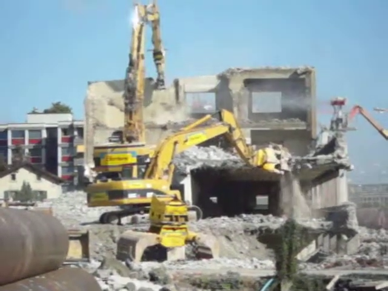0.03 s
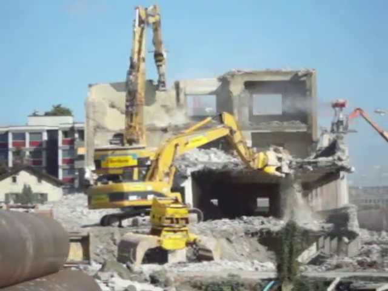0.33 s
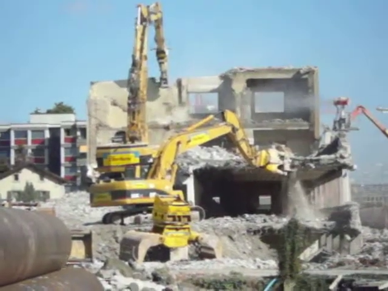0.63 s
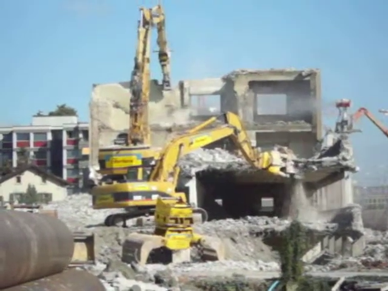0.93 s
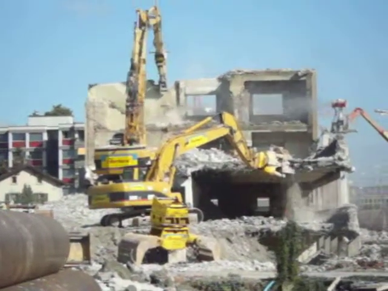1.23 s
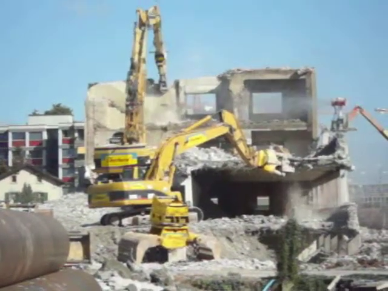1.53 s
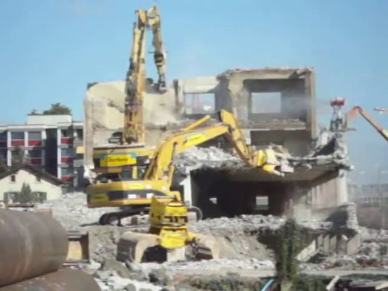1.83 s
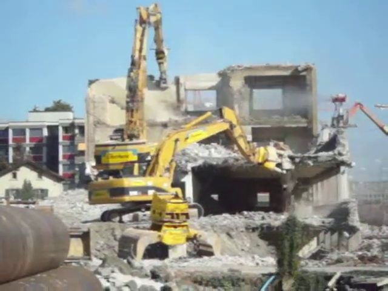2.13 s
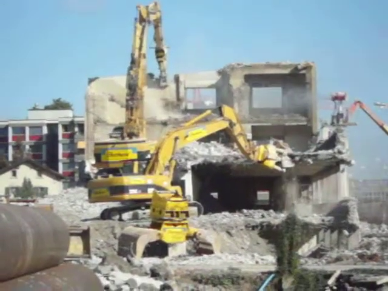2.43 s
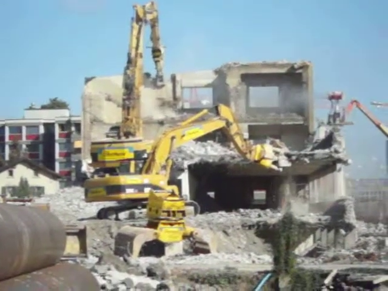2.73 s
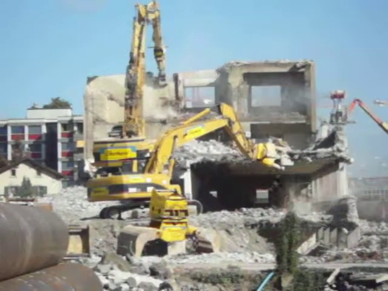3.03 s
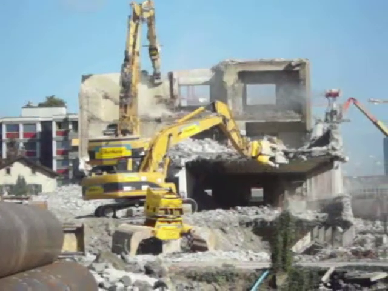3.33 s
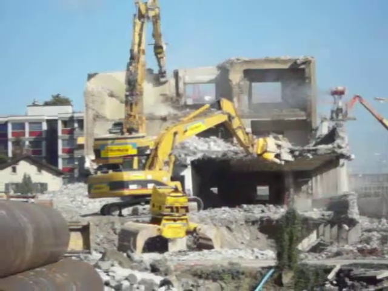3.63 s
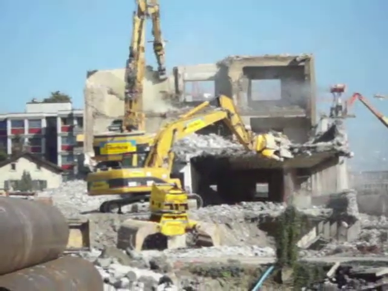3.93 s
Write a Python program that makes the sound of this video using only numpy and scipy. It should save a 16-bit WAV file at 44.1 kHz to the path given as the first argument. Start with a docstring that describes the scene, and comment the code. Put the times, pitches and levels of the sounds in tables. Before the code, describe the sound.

Diesel excavators rumble steadily on an outdoor demolition site, with a faint whine and brief metal squeaks. Midway, concrete cracks and crunches with a short echo, and small stones clink. The microphone sounds dull.

```python
"""Diesel excavators drone on a demolition site, their exhaust firing tone swelling and dipping.
Behind it, engines, fans and far traffic roar, pumps whine, oil rushes through a valve and steel squeaks.
Midway a concrete slab cracks in the jaws: bursts of tiny fractures ring slab and steel and echo
from the building. Small stones clink and trickle."""
import sys
import numpy as np
from scipy import signal
from scipy.fft import rfft, irfft
from scipy.io import wavfile

SR = 44100
rng = np.random.default_rng(int(sys.argv[2]) if len(sys.argv) > 2 else 0)


def wav_out(sig):
    """Save sig, one row per channel (or a flat mono array), as 16-bit PCM at SR to the path in sys.argv[1]."""
    wavfile.write(sys.argv[1], SR, np.round(np.clip(np.atleast_2d(sig).T, -1, 1) * 32767).astype(np.int16))


N = 176400
TIME_S = np.arange(N) / SR
CYLINDERS = 6


def from_db(db):
    """Decibels to gain."""
    return 10 ** (np.asarray(db) / 20)


def unit_rms(x):
    """Scale to unit power."""
    return x / np.sqrt(np.mean(x ** 2) + 1e-20)


def curves(rows):
    """Interpolate each column after time_s to every sample."""
    time_s, *columns = np.transpose(rows)
    return [np.interp(TIME_S, time_s, column) for column in columns]


def drift(rate_hz):
    """Slow random wander, unit RMS."""
    hop, settle = 40, 2000
    pole = np.exp(-2 * np.pi * rate_hz * hop / SR)
    noise = rng.standard_normal(N // hop + settle + 2)
    slow = signal.lfilter([1], [1, -2 * pole, pole * pole], noise)[settle:]
    return np.interp(np.arange(N) / hop, np.arange(len(slow)), unit_rms(slow))


def phase_rad(hz):
    """Running phase from a random start."""
    return 2 * np.pi * (np.cumsum(hz) / SR + rng.random())


def resonate(x, hz, t60_s):
    """Drive one decaying mode."""
    pole, step_rad = from_db(-60 / (t60_s * SR)), 2 * np.pi * hz / SR
    return signal.lfilter([0, np.sin(step_rad)], [1, -2 * pole * np.cos(step_rad), pole * pole], x + 1e-18)


def noise_band(hz, t60_s):
    """Noise-driven mode, unit RMS."""
    return unit_rms(resonate(rng.standard_normal(N), hz, t60_s))


def colour(x, spectrum):
    """Minimum-phase filter; white noise keeps its power."""
    size = 8192
    hz, db = np.transpose(spectrum)
    bins_hz = np.arange(size // 2 + 1) * SR / size
    gain = unit_rms(from_db(np.interp(np.log(bins_hz + 1), np.log(hz), db)))
    cepstrum = irfft(np.log(gain))[:size // 2]
    cepstrum[1:] *= 2
    return signal.fftconvolve(x, irfft(np.exp(rfft(cepstrum, size))))[:N]


def crossover(x, side, hz=1453):
    """Low or high side of a crossover that sums flat."""
    sos = signal.butter(4, hz, side, fs=SR, output="sos")
    return signal.sosfilt(sos, signal.sosfilt(sos, x))


def decay(start_s, t60_s):
    """Sudden onset, exponential decay."""
    age_s = TIME_S - start_s
    return (age_s >= 0) * from_db(-60 * np.clip(age_s / t60_s, 0, 4))


def clicks(per_s, spread_db):
    """Random impulses of uneven size, unit RMS."""
    sizes = from_db(spread_db * np.minimum(rng.exponential(1, N), 4)) * rng.choice([-1, 1], N)
    return unit_rms(sizes * (rng.random(N) < per_s / SR))


# Roar spectrum: frequency_hz, relative_density_db
ROAR_SPECTRUM = [(22, -5.5), (45, -1.5), (70, -3.5), (120, -1.5), (160, -1), (200, -2.5), (300, -2.5),
                 (370, -1), (450, -5.5), (620, -2), (750, -3), (880, -1.5), (1080, -4.5), (1270, -3),
                 (1500, -8.5), (1750, -13), (2200, -10.5), (2800, -14), (3350, -16.5), (4000, -26)]
# Roar envelope: time_s, low_db, treble_db
ROAR_LEVELS = [(0, -20, -30.5), (.5, -21.5, -30), (.95, -21.5, -32.5), (1.4, -23, -32.5),
               (1.85, -22.5, -33), (2.3, -21.5, -35), (2.7, -25, -33), (3.2, -23, -33.5), (3.6, -24, -35.5),
               (4, -23.5, -35)]


def roar(cycle_rad):
    """Engine, fan and traffic noise, throbbing with firings, crank and another machine's clatter."""
    clatter = np.sin(phase_rad(hz=63.4 * (1 + .03 * drift(2.4))))
    firing = np.sin(CYLINDERS * cycle_rad)
    crank = np.sin(2 * cycle_rad + drift(4))
    throb = 1 + .032 * firing + .09 * crank + .07 * clatter
    noise = colour(rng.standard_normal(N) * throb, ROAR_SPECTRUM)
    low_db, treble_db = curves(ROAR_LEVELS)
    low = unit_rms(crossover(noise, "low")) * from_db(low_db + .5 * drift(21))
    treble = unit_rms(crossover(noise, "high")) * from_db(treble_db + .5 * drift(9.1))
    return low + treble


# Machine tones: pitch_hz, level_db
WHINE_TONES = [(64.7, -39.5), (58.73, -37.5), (280.2, -39), (485.6, -41.5), (638, -44), (861, -43),
               (1663, -58), (2140, -54.5), (2770, -53.5)]


def whines():
    """Pumps, fans and gears hum, wavering in level and pitch."""
    tones = 0
    for pitch_hz, level_db in WHINE_TONES:
        peak = np.sqrt(2) * from_db(level_db + 3.8 * drift(1.3))
        tones += peak * np.sin(phase_rad(pitch_hz * (1 + .00562 * drift(8))))
    return tones


# Oil flow noise: time_s, level_db
VALVE_LEVELS = [(0, -32.5), (.45, -29), (1.0, -32.5), (1.6, -42), (4, -44)]


def valve():
    """Hydraulic oil rushes through a valve and eases off."""
    level_db, = curves(VALVE_LEVELS)
    return from_db(level_db) * noise_band(hz=854, t60_s=.018)


# Joint squeaks: centre_s, length_s, pitch_hz, level_db
JOINT_SQUEAKS = [(0.14, 0.14, 2430, -35.5), (0.438, 0.15, 3480, -37.5), (1.54, 0.051, 3380, -41.5),
                 (2.84, .05, 2800, -38.5)]


def squeaks():
    """Dry steel joints rub and sing briefly at one pitch."""
    sound = 0
    for centre_s, length_s, pitch_hz, level_db in JOINT_SQUEAKS:
        rub = np.exp(-(2 * (TIME_S - centre_s) / length_s) ** 2)
        sound += from_db(level_db) * rub * noise_band(pitch_hz, t60_s=.035)
    return sound


# Stone and steel clinks: start_s, pitch_hz, level_db, t60_s
RUBBLE_CLINKS = [(0.984, 3220, -29, 0.042), (2.137, 3704, -34, 0.053), (2.496, 3852, -30, 0.069),
                 (2.543, 3110, -29.5, .07), (2.545, 2240, -31, 0.066), (2.939, 1895, -31, .1),
                 (3.145, 3250, -33, 0.077)]


def rubble(stones_per_s=250, trickle_db=-44):
    """Single clinks over a steady trickle of small stones."""
    clinks = trickle = 0
    for start_s, pitch_hz, level_db, t60_s in RUBBLE_CLINKS:
        clinks += from_db(level_db) * decay(start_s, t60_s) * noise_band(pitch_hz, t60_s=.042)
    pitches_hz = np.geomspace(800, 3700, num=12)
    for pitch_hz in pitches_hz:
        hits = clicks(stones_per_s / len(pitches_hz), spread_db=.5)
        trickle += resonate(hits, pitch_hz, t60_s=22 / pitch_hz) / np.sqrt(pitch_hz)
    return clinks + from_db(trickle_db) * unit_rms(trickle)


def wall_echoes(direct, gain_db=-.5, build_s=.04, cutoff_hz=2500):
    """The hollow building scatters dulled echoes."""
    response = clicks(per_s=1500, spread_db=1.5) * decay(0, t60_s=.91) * (1 - np.exp(-TIME_S / build_s))
    echoes = signal.fftconvolve(direct, response / np.linalg.norm(response))[:N]
    return from_db(gain_db) * signal.sosfilt(signal.butter(1, cutoff_hz, fs=SR, output="sos"), echoes)


# Concrete cracking and falling: start_s, level_db, treble_offset_db, ring_offset_db, t60_s
SLAB_BLOWS = [(0.985, -18.5, 7, -9, .05), (1.898, -17, -2, -7.5, 0.15), (1.912, -10.5, 0.5, -6, .12),
              (1.940, -11.5, 0.5, 0.5, 0.13), (1.948, -11.5, -0.5, -6.5, 0.086),
              (1.971, -17.5, -1, -11.5, .06), (1.999, -22, 0, -18, 0.12), (2.039, -19, 3.5, -1, 0.086),
              (2.084, -17.5, -2.5, 2.5, .06), (2.143, -12.5, 0.5, -5, 0.15), (2.158, -14.5, 0, -2.5, 0.082),
              (2.190, -18, -8, 9, 0.036), (2.255, -21, 1.5, -2.5, .12)]
# Crunch spectrum: frequency_hz, relative_density_db
CRUNCH_SPECTRUM = [(60, -2), (190, 6.5), (300, -2), (430, -4), (540, 0.5), (660, 2), (920, -1.5), (1100, 1),
                   (1320, 1), (1600, -10), (2150, -6.5), (2600, -13.5), (2850, -17), (3100, -18),
                   (3400, -14.5), (3900, -27.5), (4300, -24.5)]
# Jaw and slab modes: pitch_hz, relative_db, t60_s
JAW_SLAB_MODES = [(196, -19, 0.22), (896, 2, 0.11), (961, 9, 0.028), (1250, -2.5, 0.021),
                  (2155, -11.5, 0.068), (2770, -12, 0.023), (3420, -22, 0.028)]


def slab_blows(cracks_per_s=9000, spread_db=2, ring_gain_db=.5):
    """Each blow is a dying burst of fractures; returns the crunch and the ring of slab and jaws."""
    low = treble = strike = 0
    for start_s, level_db, treble_offset_db, ring_offset_db, t60_s in SLAB_BLOWS:
        force = from_db(level_db) * decay(start_s, t60_s)
        low += force
        treble += force * from_db(treble_offset_db)
        strike += force * from_db(ring_offset_db)
    cracks = clicks(cracks_per_s, spread_db)
    bursts = crossover(cracks * low, "low") + crossover(cracks * treble, "high")
    crunch = colour(bursts, CRUNCH_SPECTRUM)
    knocks = strike * clicks(cracks_per_s, spread_db)
    ring = 0
    for pitch_hz, relative_db, t60_s in JAW_SLAB_MODES:
        ring += from_db(relative_db) * resonate(knocks, pitch_hz, t60_s) / np.sqrt(t60_s)
    return crunch, from_db(ring_gain_db) * strike.std() * unit_rms(ring)


# Near engine speed: time_s, firing_hz
FIRING_RATE = [(0, 91.5), (.4, 93.73), (.62, 90.4), (1.0, 92.0), (1.35, 90.84), (1.65, 91.77), (1.9, 91.9),
               (2.5, 92.2), (2.85, 91.64), (3.1, 92.4), (3.4, 91.37), (4, 91.93)]


def engine_cycle():
    """Phase of the near diesel; each cylinder fires once a cycle."""
    firing_hz, = curves(FIRING_RATE)
    return phase_rad(firing_hz / CYLINDERS)


# Near exhaust firing tone: time_s, level_db
EXHAUST_LEVELS = [(0,-18),(.15,-18),(.23,-29),(.29,-20),(.39,-23),(.49,-17),(.6,-26.5),(.69,-17.5),(.78,-16.5),(.86,-35),(1.0,-14),(1.11,-29),(1.2,-20),(1.45,-16),(1.67,-28),(1.82,-19.5),(2.14,-19),(2.2,-29.5),(2.29,-16),(2.39,-22),(2.5,-17),(2.7,-22),(2.88,-31),(2.98,-20),(3.22,-15.5),(3.53,-14.5),(3.7,-17),(3.79,-23),(3.86,-20.5),(3.94,-35),(4,-17)]
# Weak engine orders: cycle_multiple
ENGINE_ORDERS = [9, 10, 12, 15, 18]
# Strength of each order: level_db
ORDER_LEVELS = [-38.5, -43.5, -39, -45, -41.5]


def exhausts(cycle_rad, far_hz=94.3, far_db=-35.5):
    """Firing tone and weak orders of the near diesel; a far one hunts around nearly the same speed."""
    swell, = curves([(time_s, from_db(level_db)) for time_s, level_db in EXHAUST_LEVELS])
    near = swell * np.sin(CYLINDERS * cycle_rad)
    for order, level_db in zip(ENGINE_ORDERS, ORDER_LEVELS):
        gain = from_db(level_db + 1.1 * drift(3.6))
        near += gain * np.sin(order * cycle_rad + drift(2.2) + 2 * np.pi * rng.random())
    far = from_db(far_db) * np.sin(phase_rad(far_hz * (1 + .018 * drift(2))))
    return np.sqrt(2) * (near + far)


def scene():
    """Machines and breaking concrete in mono; only the crunch echoes."""
    cycle_rad = engine_cycle()
    crunch, ring = slab_blows()
    machines = exhausts(cycle_rad) + whines() + roar(cycle_rad) + squeaks()
    return (machines + crunch + ring + rubble() + wall_echoes(crunch) + valve())[None]


def record(dry, mic_limit=.72, rolloff_hz=3750, stop_hz=4935, output_limit=.69, output_stop_hz=15800):
    """Narrow-band microphone chain; peaks are limited at input and output."""
    limited = np.clip(dry, -mic_limit, mic_limit)
    dull = signal.sosfilt(signal.butter(6, rolloff_hz, fs=SR, output="sos"), limited)
    narrow = signal.sosfilt(signal.cheby2(12, 60, stop_hz, fs=SR, output="sos"), dull)
    output = np.clip(narrow, -output_limit, output_limit)
    return signal.sosfilt(signal.cheby2(12, 70, output_stop_hz, fs=SR, output="sos"), output)


dry = scene()
out = record(dry)
wav_out(out)
```